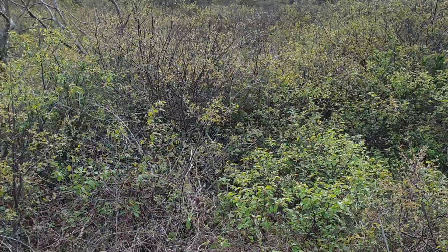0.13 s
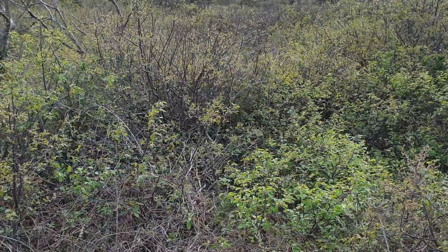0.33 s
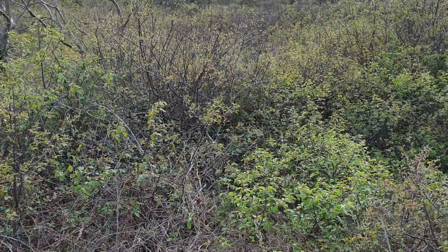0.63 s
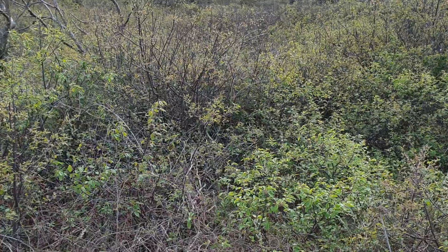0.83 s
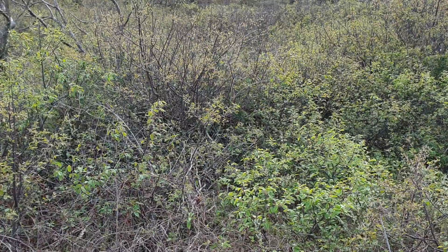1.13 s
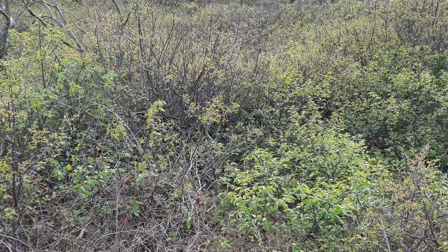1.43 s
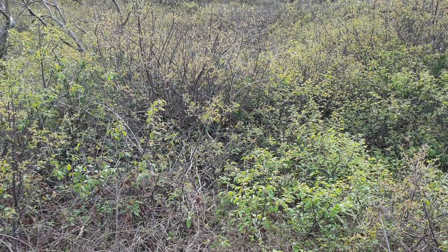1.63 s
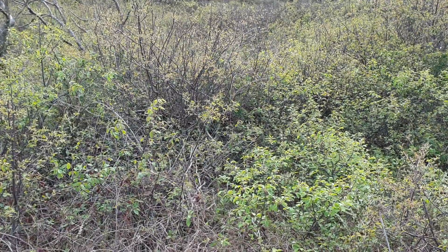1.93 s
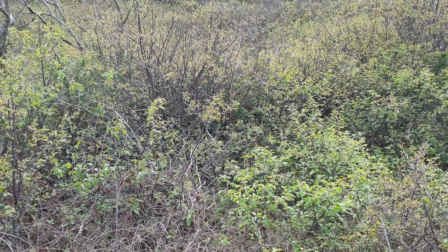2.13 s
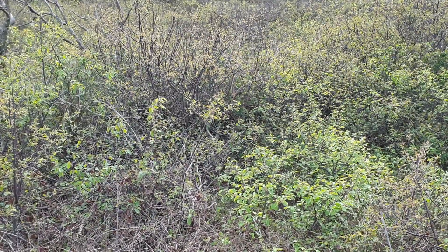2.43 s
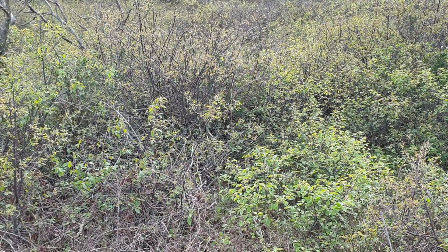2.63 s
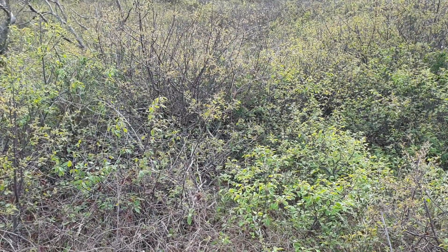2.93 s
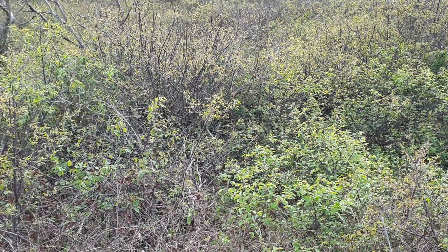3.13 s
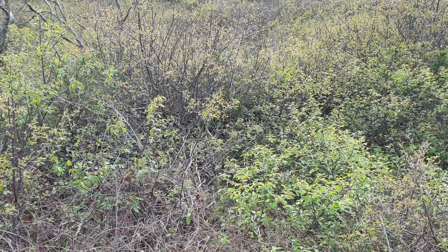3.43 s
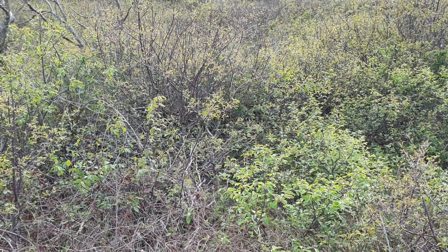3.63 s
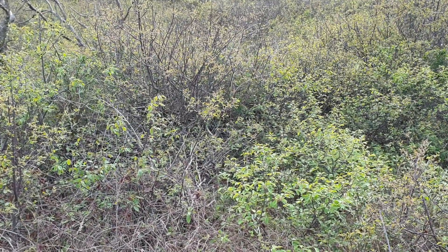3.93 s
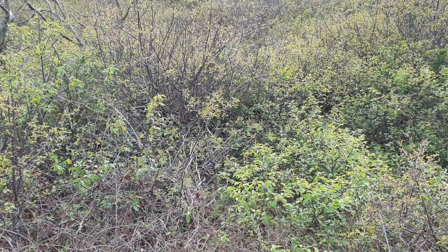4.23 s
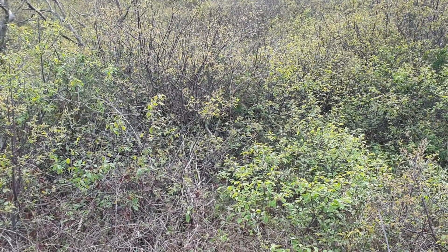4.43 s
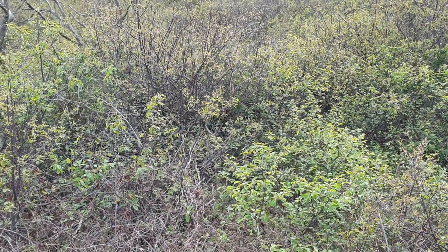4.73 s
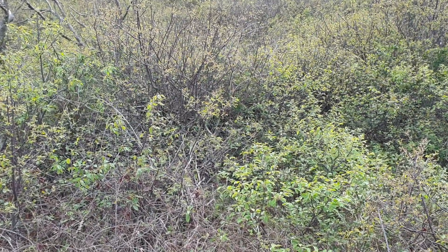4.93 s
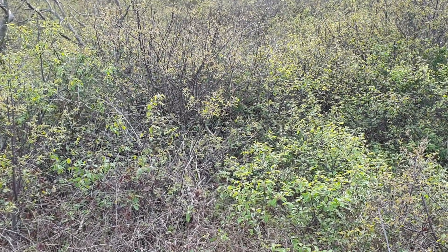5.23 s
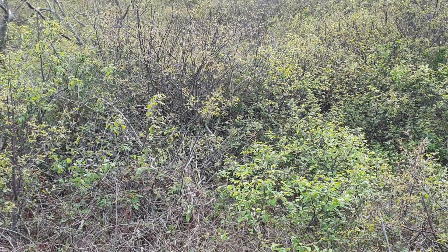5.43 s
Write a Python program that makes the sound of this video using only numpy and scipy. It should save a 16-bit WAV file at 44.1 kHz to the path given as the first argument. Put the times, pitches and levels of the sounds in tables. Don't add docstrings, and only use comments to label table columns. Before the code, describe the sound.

Open air in dense scrub, heard by a small stereo microphone without wind protection. From 0 to about 1.3 s, wind knocks hard, with dull low thumps and flutter shifting between sides, over a deep rumble and faint hiss. A neighbouring bird chatters quickly and hoarsely on the right from 0.5 to 1.3 s, over a blurred far chorus that fades by 2 s. Two short high notes sound around 1.4 s, then tiny low distant notes near 1.7. The nightingale, close and slightly right, begins at 1.8 s: a thin rising whistle, two throbbing harsh chips at 2.0 and 2.1, a sharp arch at 2.2, then rapid buzzing trills at 2.3, 2.7 and 3.1, separated by snaps and steep falling sweeps. A last sweep ends it at 3.4. Twigs scatter a short echo. Afterwards it is sparse: soft gusts, faint distant calls around 4.3 to 5, stronger buffets near 5.4 and short bird glides at the end.

```python
import sys
import numpy as np
from scipy import signal
from scipy.fft import rfft, irfft
from scipy.io import wavfile

SR = 44100
rng = np.random.default_rng(int(sys.argv[2]) if len(sys.argv) > 2 else 0)


def dump(signal):
    limited = np.clip(np.atleast_2d(signal).T, -1, 1)
    pcm = np.round(limited * 32767).astype(np.int16)
    wavfile.write(sys.argv[1], SR, pcm)


def amplitude_ratio(level_db):
    exponent = np.asarray(level_db, float) / 20
    return 10 ** exponent


N = 246519


def nightingale():
    heard = scrub(song(), pan_db=-3.5, ports=0.83, lag=.4, ground_db=-2, echo_db=-11,
                  scatter_db=9, t60=0.13, far_db=-7.5, far_t60=0.47)
    heard += scrub(chips(), pan_db=-1.5, ports=1, lag=.1, ground_db=-5, echo_db=-9.5,
                   scatter_db=12.5, t60=0.125, far_db=-5.5, far_t60=0.45)
    heard += scrub(trills(), pan_db=-2.0, ports=1, lag=0.09, ground_db=-5, echo_db=-11.5,
                   scatter_db=10.5, t60=0.14, far_db=-4.0, far_t60=0.43)
    return heard


# (time from the note's mark [s], pitch [Hz], level under its top [dB])
WHISTLE = [(-.068, 2013, -21), (-.058, 2350, -8.5), (-.03, 2346, -7), (0, 2416, 2.5), (.016, 2487, -9.5),
           (.022, 2516, -32)]
ARCH = [(-.05, 1286, -24), (-.042, 1800, -15), (-.025, 2040, -0.5), (-.01, 2430, -7), (0, 2725, 0.5),
        (.004, 2650, 0.5), (.009, 1943, -0.5), (.018, 1170, -18)]
RISE = [(-.015, 1353, -21.5), (-.008, 1774, -5), (0, 2035, -0.5), (.01, 2700, -1), (.014, 2890, -13)]
SHORT_RISE = [(-.012, 1450, -19), (-.006, 1750, -1.5), (0, 2050, -1), (.007, 2450, -4.5), (.011, 2600, -22)]
SNAP = [(-.0045, 3790, -23), (0, 2846, -0.5), (.004, 2300, -13.5), (.0095, 1560, -29)]
SHORT_SNAP = [(-.0035, 3000, -17.5), (0, 2660, -0.5), (.003, 2400, -4.5), (.0065, 1950, -23)]
WIDE_SWEEP = [(-.031, 2990, -24), (-.025, 3790, -24), (-.019, 3594, -20.5), (-.0135, 3465, -18),
              (-.009, 3260, 3), (0, 2764, -1), (.01, 2300, -10), (.018, 2000, -14.5), (.024, 1800, -29.5)]
SWEEP = [(-.032, 3594, -30.5), (-.021, 3580, -20), (-.0155, 3500, -23), (-.0115, 3316, 2.5),
         (0, 2800, -0.5), (.0105, 2280, -7.5), (.024, 2112, -36.5)]
LAST_SWEEP = [(-.024, 3950, -22.5), (-.016, 3770, -19), (-.01, 3350, -6.5), (0, 2740, -0.5),
              (.012, 2400, -7), (.024, 2235, -18)]
# (mark [s], top level [dB rms], length [ratio], pitch [ratio], swell [dB per s])
WHISTLE_TIMES = [
    (1.89, -40.5, 0.98, 1, 0.0024),
]
ARCH_TIMES = [
    (2.22, -33.5, 0.98, 1, 0.0023),
]
RISE_TIMES = [
    (2.516, -41.5, 0.93, 0.96, 198),
]
SHORT_RISE_TIMES = [
    (2.894, -47, 1.01, 0.99, 12),
    (3.302, -56, 1.2, 1.024, 10),
]
SNAP_TIMES = [
    (2.536, -29.5, 1.06, 0.96, 102.5),
    (2.913, -32, .9, 1, -100),
]
SHORT_SNAP_TIMES = [
    (3.32, -41.5, 0.95, 1.01, 10),
]
WIDE_SWEEP_TIMES = [
    (2.614, -30.5, 1.01, 1.043, 9.6),
]
SWEEP_TIMES = [
    (2.996, -30, 1.16, 1.004, 100),
]
LAST_SWEEP_TIMES = [
    (3.399, -35, 1.01, 1, 8.2),
]


def song():
    pure = [(WHISTLE, WHISTLE_TIMES), (LAST_SWEEP, LAST_SWEEP_TIMES), (RISE, RISE_TIMES),
            (SHORT_RISE, SHORT_RISE_TIMES), (WIDE_SWEEP, WIDE_SWEEP_TIMES), (SWEEP, SWEEP_TIMES)]
    quick = [(ARCH, ARCH_TIMES), (SNAP, SNAP_TIMES), (SHORT_SNAP, SHORT_SNAP_TIMES)]
    out = np.zeros(N)
    for shape, times in pure:
        out += sung(shape, times, overtone_db=-43.0, rough=0.038, rasp_hz=296.6)
    for shape, times in quick:
        out += sung(shape, times, overtone_db=-37.0, rough=0.05, rasp_hz=300)
    return out


# (time from its mark [s], pitch [Hz], level under its top [dB])
CHIP = [(-.031, 3916, -19.5), (-.027, 5200, -7), (-.0215, 7240, -19), (-.014, 7660, -19),
        (-.009, 6500, -11.5), (0, 5500, 0), (0.0127, 4400, -6), (0.024, 3080, -17)]
# (mark [s], top level [dB rms], length [ratio], pitch [ratio], swell [dB per s])
CHIP_TIMES = [
    (1.999, -41.5, .99, 0.99, 195),
    (2.102, -38, 1.01, 0.97, -150),
]


def chips():
    throb_hz, throb_swing_hz, throb_depth, throb_from_s = 168, 1100, 0.86, -.012
    out = np.zeros(N)
    s, hz, level_db = np.transpose(CHIP)
    for mark_s, top_db, length, pitch, swell in CHIP_TIMES:
        t = np.arange(s[0] * length, s[-1] * length, 1 / SR)
        turn = (t * throb_hz / length + 0.35) % 1
        on = np.clip((t - throb_from_s) / 0.0026, 0, 1)
        throb_db = 20 * np.log10(1 - on * throb_depth * np.cos(np.pi * turn) ** 2)
        track = pitch * np.interp(t / length, s, hz) + on * throb_swing_hz * (.5 - turn)
        note_db = top_db + 3.4 * on + swell * t + np.interp(t / length, s, level_db) + throb_db
        add_note(out, mark_s + t[0], track, note_db, overtone_db=-13.5, rough=0.18, rasp_hz=600)
    return out


# (pitch it favours open [Hz], pitch it closes to [Hz])
TRILL_MOUTHS = [
    (4530, 5400),
    (4400, 5600),
    (6650, 5900),
]
# (middle [s], rattle level [dB], low note level [dB])
TRILL_STROKES = [
    [(2.295, -53, -54), (2.307, -42, -53), (2.320, -45.5, -55.5), (2.333, -48, -53.5),
     (2.348, -48.5, -60.5), (2.362, -48, -55.5), (2.378, -49, -63), (2.393, -54, -65), (2.409, -53.5, -67),
     (2.424, -53.5, -59.5), (2.440, -59.5, -62)],
    [(2.700, -53.5, -67.5), (2.713, -50, -60.5), (2.726, -52.5, -55), (2.741, -57.5, -58.5),
     (2.754, -52.5, -64), (2.768, -58, -62.5), (2.782, -55.5, -60), (2.796, -55, -65), (2.810, -55.5, -64),
     (2.825, -57, -61)],
    [(3.094, -63.5, -61), (3.107, -54, -56), (3.119, -55, -59.5), (3.133, -54.5, -61), (3.147, -58, -71),
     (3.161, -54.5, -60), (3.175, -56.5, -68), (3.188, -57.5, -59.5), (3.201, -57.5, -61),
     (3.214, -61, -79), (3.228, -59, -66.5)],
]
# (pitch [Hz], lateness [ms], level at first stroke [dB], gain by the last [dB])
THROAT = [(3350, 5, 1, 4.5), (3950, 0.5, -1, 12), (4400, 0.5, 7, -7), (5233, -1, 1.5, 2.5),
          (5620, -0.5, 4, -4), (6350, 1.9, -0.5, 3.5), (6620, 1, 4.5, 0.5), (7150, 1.5, -2.5, -2.5),
          (7590, 3.5, -2.5, 0.5), (11400, 1.3, 7, 1.5)]


def trills():
    stroke_s = 0.011
    out = np.zeros(N)
    u = np.linspace(0, 1, round(stroke_s * SR))
    count = len(u)
    swell = -129 * (u - .36) ** 2 * np.where(u < .36, 3.5, .8)
    for (mouth_hz, closing_hz), strokes in zip(TRILL_MOUTHS, TRILL_STROKES):
        for (middle_s, rattle_db, low_db), along in zip(strokes, np.linspace(0, 1, len(strokes))):
            s = middle_s - .0054
            add_note(out, s + 0.0015, 2760 + 120 * u, low_db + swell,
                     overtone_db=-15.5, rough=0.18, rasp_hz=400)
            clicks = (rng.random(count) < 1500 / SR) * rng.standard_normal(count)
            rattle = clicks + 0.052 * rng.standard_normal(count)
            for (hz, late_ms, own_db, gained_db), luck in zip(THROAT, rng.standard_normal(len(THROAT))):
                hz = hz * (1 + .005 * rng.standard_normal())
                width_hz = 300 if hz < 8000 else 7500
                at = round((s + late_ms / 1000) * SR)
                ring = resonance(resonance(rattle, hz, width_hz), hz, 2.4 * width_hz)
                mouth_db = (1 - along) * favoured(hz, mouth_hz) + along * favoured(hz, closing_hz)
                level_db = rattle_db - 2.5 + own_db + along * gained_db + 1.9 * luck + swell + mouth_db
                out[at:at + count] += rms_one(ring) * amplitude_ratio(level_db - 3.5) * np.hanning(count) ** 0.22
                if hz < 8000:
                    add_note(out, at / SR, hz + 0.36 * width_hz * (u - .4), level_db - 2.5,
                             overtone_db=-15.5, rough=0.43, rasp_hz=400)
    return out


def favoured(hz, mouth_hz):
    return -min(25.5 * abs(np.log2(hz / mouth_hz)), 7.5)


def resonance(x, hz, width_hz):
    r = np.exp(-np.pi * width_hz / SR)
    return signal.lfilter([1, 0, -1], [1, -2 * r * np.cos(2 * np.pi * hz / SR), r * r], x)


def sung(shape, times, overtone_db, rough, rasp_hz):
    out = np.zeros(N)
    s, hz, level_db = np.transpose(shape)
    for mark_s, top_db, length, pitch, swell in times:
        t = np.arange(s[0] * length, s[-1] * length, 1 / SR)
        track = pitch * np.interp(t / length, s, hz)
        note_db = top_db + swell * t + np.interp(t / length, s, level_db)
        add_note(out, mark_s + t[0], track, note_db, overtone_db, rough, rasp_hz)
    return out


def add_note(out, start_s, hz, level_db, overtone_db, rough, rasp_hz):
    at = round(start_s * SR)
    count = min(len(hz), N - at)
    phase = 2 * np.pi * np.cumsum(hz) / SR + rough * drift(rasp_hz, count=len(hz))
    tone = np.sin(phase)
    for k in range(4):
        audible = (k + 2) * hz < 16000
        tone += amplitude_ratio(overtone_db - 1.2 * k) * np.sin((k + 2) * phase) * audible
    tone *= np.sqrt(2) * amplitude_ratio(level_db) * (1 + .5 * rough * drift(rasp_hz, count=len(hz)))
    out[at:at + count] += (tone * signal.windows.tukey(len(hz), .1))[:count]


def drift(rate, count=N):
    r = np.exp(-2 * np.pi * rate / SR)
    noise = rng.standard_normal(count + 3000)
    return rms_one(signal.lfilter([1], [1, -2 * r, r * r], noise)[3000:])


def rms_one(x):
    return x / np.sqrt(np.mean(x ** 2) + 1e-20)


# (left delay [ms], right delay [ms], left level [dB], right level [dB])
ECHOES = [(0.99, 0.917, -13.5, -11.5), (5.206, 5.2, -0.5, -12.5), (12.14, 16, -21, -20),
          (16.9, 6.3, -24.5, -32.5), (22.9, 11, -18, -25)]
# (pitch [Hz], left lead [radians])
PORTS = [(2900, 0), (3050, 1.3), (3480, 1.8), (3800, 3.5), (4130, 4.4), (4800, 5.5), (5800, 5.7),
         (6200, 6.8), (8000, 7.4)]
# (pitch [Hz], level [dB])
HOUSING = [(1000, 0), (7800, 4), (8800, -10.5), (9400, -4.5), (11500, 4), (15500, -7.5)]


def scrub(x, pan_db, lag, ground_db, echo_db, scatter_db, t60, far_db, far_t60, ports=0):
    ground_ms, ground_hz, ground_half_width_hz = 2.508, 2800, 400
    t = np.arange(round(.5 * SR)) / SR
    hz = np.fft.rfftfreq(len(t), 1 / SR)
    tail = rng.standard_normal((2, len(t))) / np.sqrt(SR) * np.clip(t / 0.008, 0, 1)
    tail *= amplitude_ratio(scatter_db - 60 * t / t60) + amplitude_ratio(far_db - 60 * t / far_t60)
    ground = amplitude_ratio(ground_db) / (1 + ((hz - ground_hz) / ground_half_width_hz) ** 6)
    clear = (1 + ground * np.exp(-2j * np.pi * hz * ground_ms / 1000)) * np.ones((2, 1))
    left_ms, right_ms, left_db, right_db = np.transpose(ECHOES)[:, :, None]
    clear[0] += np.sum(amplitude_ratio(left_db + echo_db) * np.exp(-2j * np.pi * hz * left_ms / 1000), axis=0)
    clear[1] += np.sum(amplitude_ratio(right_db + echo_db) * np.exp(-2j * np.pi * hz * right_ms / 1000), axis=0)
    clear[0] *= np.exp(-2j * np.pi * hz * lag / SR)
    clear[1] *= np.exp(-1j * ports * np.interp(hz, *np.transpose(PORTS)))
    clear /= 1 + (hz / 6500) ** 2
    heard = clear + rfft(tail) * (1 + (hz / 9000) ** 2) ** .5
    heard *= amplitude_ratio(np.interp(hz, *np.transpose(HOUSING)))
    early = 900
    path = np.roll(irfft(heard, len(t)), early, axis=1)
    return signal.fftconvolve(x[None], path, axes=1)[:, early:N + early] * amplitude_ratio([[pan_db / 2], [-pan_db / 2]])


# (start [s], length [s], first pitch [Hz], last pitch [Hz], level [dB rms])
RIGHT_BIRD = [(.505, 0.032, 4400, 3210, -63.5), (.548, 0.031, 3040, 4520, -61),
              (.58, 0.043, 3950, 2870, -56), (.72, 0.014, 3920, 2900, -67), (.75, 0.026, 2600, 4330, -59),
              (.785, 0.038, 3830, 2846, -55.5), (.90, 0.031, 3500, 4300, -71),
              (.945, 0.034, 2700, 3400, -62), (.98, 0.023, 4620, 3870, -67),
              (.985, 0.017, 2400, 2000, -68.5), (1.06, 0.034, 3490, 4130, -66.5),
              (1.105, 0.037, 2660, 3600, -62.5), (1.17, 0.024, 2610, 3390, -60.5),
              (1.22, 0.023, 2300, 3690, -63.5), (1.27, 0.028, 2620, 3660, -64.5),
              (1.14, 0.026, 2400, 2170, -71), (1.165, .02, 1840, 2050, -73),
              (1.185, 0.014, 2880, 2660, -66), (1.08, 0.014, 4320, 3960, -78),
              (1.285, 0.013, 2820, 2660, -68), (1.145, 0.022, 2900, 3400, -72),
              (1.27, .03, 1780, 2210, -73)]


def right_bird():
    notes = calls(RIGHT_BIRD, halfway=0.53, rough=0.59, rasp_hz=130)
    return amplitude_ratio(0.5) * scrub(notes, pan_db=-6.0, lag=4.95, ground_db=-18, echo_db=-0.5,
                            scatter_db=11, t60=0.13, far_db=-8.0, far_t60=0.39)


# (start [s], length [s], first pitch [Hz], last pitch [Hz], level [dB rms])
LEFT_BIRD = [(1.406, 0.037, 3570, 3480, -54), (1.458, 0.042, 4260, 4160, -49),
             (1.452, .008, 4600, 4300, -60), (4.91, 0.06, 5900, 3900, -76), (4.96, .035, 3900, 3780, -79),
             (5.185, 0.066, 5800, 3870, -74), (5.248, 0.045, 3860, 3820, -74),
             (5.289, 0.03, 3860, 3890, -49), (5.42, 0.058, 6450, 4200, -65), (5.474, .02, 4200, 4100, -68),
             (5.49, 0.045, 4090, 4040, -56), (5.535, .028, 4050, 4040, -53),
             (5.575, 0.035, 4300, 4560, -59)]


def left_bird():
    notes = calls(LEFT_BIRD, halfway=.72, rough=.2, rasp_hz=90)
    return scrub(notes, pan_db=-3.5, lag=-2.5, ground_db=-30.0, echo_db=-2.5,
                 scatter_db=15.0, t60=0.089, far_db=-3.5, far_t60=0.3)


# (start [s], length [s], first pitch [Hz], last pitch [Hz], level [dB rms])
HOARSE = [(.192, 0.048, 4750, 5100, -79.5), (.357, 0.012, 2350, 4180, -71.5),
          (.376, 0.058, 4410, 4960, -72), (.711, 0.027, 5850, 4350, -77.5), (1.246, 0.035, 5440, 5900, -73),
          (1.336, 0.026, 5880, 5030, -75), (1.592, 0.16, 3430, 3640, -76), (1.63, 0.15, 4100, 4040, -79.5),
          (1.565, 0.057, 2600, 3840, -75), (5.191, 0.049, 7260, 5970, -80), (5.433, 0.044, 7070, 5240, -71),
          (4.59, .06, 3400, 3140, -81.5)]


def hoarse_birds():
    notes = calls(HOARSE, halfway=0.67, rough=1.25, rasp_hz=170)
    return scrub(notes, pan_db=-6, lag=0.97, ground_db=-13.5, echo_db=-5.0,
                 scatter_db=15.0, t60=0.17, far_db=-5.5, far_t60=0.42)


# (start [s], length [s], first pitch [Hz], last pitch [Hz], level [dB rms])
FAR_BIRDS = [(.30, 0.22, 8170, 7840, -75), (3.70, 0.26, 5360, 4430, -89.5), (4.521, .041, 5710, 6410, -87),
             (4.721, .046, 5610, 6310, -85), (4.255, 0.018, 1400, 1420, -65),
             (4.255, .022, 2800, 2760, -76), (4.585, 0.079, 1432, 1326, -71),
             (4.59, 0.058, 2780, 2740, -64.5), (4.59, 0.093, 2340, 2225, -83),
             (4.995, 0.076, 3710, 3732, -64), (1.5, 0.097, 2176, 2232, -73.5),
             (1.668, 0.011, 1430, 1430, -65.5), (1.695, 0.013, 1415, 1430, -61.5),
             (1.725, 0.02, 1464, 1420, -61.5)]


def far_birds():
    notes = calls(FAR_BIRDS, halfway=0.54, rough=0.49, rasp_hz=100)
    return scrub(notes, pan_db=-2.0, lag=.4, ground_db=-22.0, echo_db=-2.0,
                 scatter_db=8.5, t60=0.11, far_db=-10.0, far_t60=0.49)


# (start [s], length [s], first pitch [Hz], last pitch [Hz], level [dB rms])
THIN = [(3.43, .22, 3230, 2800, -79), (4.855, .09, 4280, 4520, -87), (5.1, .055, 4560, 4450, -84),
        (5.15, .045, 4450, 3700, -84), (5.318, .068, 3870, 3960, -71), (5.29, .05, 3340, 3290, -83),
        (5.34, .035, 3330, 3800, -80), (5.483, .03, 2940, 3000, -77), (5.515, .055, 3080, 3650, -82)]


def thin_whistles():
    notes = calls(THIN, halfway=0.67, rough=.12, rasp_hz=60)
    return scrub(notes, pan_db=-1.5, lag=.6, ground_db=-15.0, echo_db=-13.0,
                 scatter_db=6, t60=0.1, far_db=-14, far_t60=0.37)


def calls(rows, halfway, rough, rasp_hz):
    out = np.zeros(N)
    for start_s, length_s, first_hz, last_hz, level_db in rows:
        u = np.linspace(-1, 1, round(length_s * SR))
        hz = first_hz + (last_hz - first_hz) * (halfway + .5 * u + (.5 - halfway) * u * u)
        note_db = level_db - 7 * (u - .1) ** 2
        add_note(out, start_s, hz, note_db, overtone_db=-44, rough=rough, rasp_hz=rasp_hz)
    return out


# (time [s], peak level [dB], pitch [Hz], left over right [dB])
KNOCKS = [(0.087, -23, 344, -3), (0.211, -30.5, 323, 0.5), (0.287, -28.5, 280, 2),
          (0.367, -33.5, 340, -2.5), (0.412, -29, 358, -2), (0.48, -25.5, 346, -2.5), (0.526, -30, 294, 5),
          (0.624, -32, 304, -7), (0.759, -34, 338, -8), (0.833, -31.5, 316, -1), (1.01, -40.5, 330, -11),
          (1.136, -30.5, 239, 4.0), (1.169, -38, 356, -5.5), (1.22, -34, 352, 6), (1.38, -30.5, 404, 8.5),
          (1.382, -26.5, 317, -5), (1.476, -39.5, 302, 8), (1.746, -31.5, 350, -4), (1.776, -28, 330, 2),
          (2.225, -41, 278, -6.5), (2.399, -36.5, 310, 0), (2.619, -38.5, 362, -15),
          (2.871, -46.5, 397, -12), (3.01, -38, 313, 7), (3.902, -45.5, 323, 1), (4.168, -37, 327, -13.5),
          (4.427, -42, 304, 0), (4.518, -35, 290, -2), (4.587, -38.5, 318, -4), (4.681, -35, 307, -3.5),
          (5.018, -43, 393, 6), (5.064, -44, 409, -6), (5.336, -32.5, 300, -1.5), (5.393, -28.5, 238, -1),
          (5.431, -36, 274, -7.5), (5.456, -28, 257, 2)]
# (time [s], peak level [dB], pitch [Hz], left over right [dB])
CRACKS = [(.088, -23, 630, 2.5), (.37, -34, 553, -9), (.417, -33, 560, -8), (.496, -24, 622, 5.5),
          (.573, -32.5, 633, -7.5), (.593, -33, 586, 2), (1.777, -35, 545, 0)]


def knocks():
    out = np.zeros((2, N))
    t = np.arange(-400, 800) / SR
    side = np.array([[.5], [-.5]])
    blows = KNOCKS + CRACKS
    for (s, peak_db, pitch_hz, pan_db), luck in zip(blows, rng.standard_normal((len(blows), 4))):
        at = max(round(s * SR) - 250, 0)
        hz = pitch_hz * amplitude_ratio(0.99 * luck[:2, None])
        thump = np.sin(2 * np.pi * hz * t + 2 * luck[2:, None]) * np.exp(-np.abs(t) * pitch_hz)
        out[:, at:at + len(t)] += (thump * amplitude_ratio(peak_db + 2.0 + side * pan_db))[:, :N - at]
    return signal.sosfilt(signal.butter(2, 1100, fs=SR, output="sos"), out)


# (pitch [Hz], level [dB per Hz])
RUMBLE = [(12, -40.5), (20, -12.5), (76, -0.5), (102, -2), (200, -13), (260, -35.5), (440, -120)]
# (pitch [Hz], level [dB per Hz])
FLUTTER = [(94, -27.5), (160, -4.5), (210, -1.5), (351, -1.5), (506, -12.5), (634, -20), (1100, -44),
           (1500, -54.5), (1950, -75), (3300, -120)]


def wind():
    rumble_db, pan_db, extra_db = gusts()
    side = np.array([[.5], [-.5]])
    eddies = np.array([drift(12.4), drift(24)])
    jolts = np.array([drift(67), drift(45)])
    rumble = rms_one(coloured(RUMBLE) * amplitude_ratio(4.63 * eddies + 1.0 * jolts))
    flutter_db = rumble_db + extra_db - 7.5 + side * 0.26 * pan_db
    low = rms_one(coloured(FLUTTER[:4]) * amplitude_ratio(3.82 * eddies + 4.05 * jolts))
    high = rms_one(coloured(FLUTTER[3:]) * amplitude_ratio(2.6 * eddies + 3.9 * jolts))
    flutter = amplitude_ratio(flutter_db) * (low + amplitude_ratio(-5.5 + 0.069 * (flutter_db + 43)) * high)
    return amplitude_ratio(3.0 + rumble_db + side * pan_db) * rumble + flutter


# (time [s], level [dB], left over right [dB])
BREEZE = [(0, -35, -4.5), (.6, -35, 2), (.7, -37.5, 5), (1.28, -43, 3), (1.6, -44.5, -10), (2.0, -56, -11),
          (2.4, -41.5, -8.5), (2.65, -44, -0.5), (2.94, -52, 7), (3.03, -46, 2), (3.3, -51.5, -2.5),
          (3.5, -45.5, 7), (3.78, -57, -4.5), (4.0, -45, -2), (4.7, -48.5, -0.5), (5.03, -46, -8),
          (5.2, -55.5, 6), (5.59, -55, 2.5)]
# (middle [s], half length [s], level over the breeze [dB], left over right [dB], flutter [dB])
GUSTS = [(0.101, 0.039, 6, 1.5, 2), (0.15, 0.053, -11.5, 9, 2), (0.262, 0.041, 2, -1, -6.5),
         (0.38, 0.13, -5.5, 9, 6.5), (0.482, 0.04, -2.5, -14, 9), (0.584, 0.12, -1, 5.5, 10),
         (1.395, 0.059, -14.5, -4, 24.5), (1.475, 0.064, -4, 24, 7.5), (1.666, 0.16, -9.5, 11, 4),
         (1.786, 0.12, 12.5, 21, -1.5), (1.957, 0.039, -14.5, -14, 8), (2.012, 0.064, 12.5, 1.5, -2),
         (2.082, 0.099, -6, 1, 1), (3.351, 0.12, -19.5, -27.5, 7.5), (3.437, 0.13, 3.5, -7, -1.5),
         (3.604, 0.023, 9.5, 9, -12.5), (4.077, 0.14, -7.5, -4.5, 6.5), (4.207, 0.13, 6, 0.5, 1),
         (4.38, 0.045, -1, 5, 5.5), (4.451, 0.065, 11.5, -4.5, -1.5), (4.543, 0.081, 3, -0.5, 7),
         (4.67, 0.073, 11.5, -5, 1), (5.278, 0.065, -16, -2.5, 14.5), (5.394, 0.15, 15.5, 5, 2.5),
         (1.22, 0.1, -0.5, -0.5, 7), (2.62, 0.14, 4.5, -5.5, -1), (4.299, 0.092, 1, -7.5, 5),
         (5.093, 0.078, 1, 2, 7), (5.469, 0.043, 9, 7, 2.5)]


def gusts():
    level_db, pan_db = in_time(BREEZE)
    middle_s, half_s, *columns = np.transpose(GUSTS)
    place = np.clip((np.arange(N)[:, None] / SR - middle_s) / half_s, -1, 1)
    swell = np.cos(np.pi / 2 * place) ** 2
    over_db, side_db, flutter_db = (swell @ column for column in columns)
    return level_db + over_db, pan_db + side_db, flutter_db


def in_time(rows):
    s, *columns = np.transpose(rows)
    return [np.interp(np.arange(N) / SR, s, column) for column in columns]


# (time [s], level [dB])
CHORUS = [(0, -81.5), (.35, -82), (.6, -76.5), (1.1, -75.5), (1.21, -68), (1.33, -76.5), (1.47, -82),
          (1.87, -86), (2.1, -120)]


def chorus():
    low_db, = in_time(CHORUS)
    high_db = -84 - 39.5 * np.clip(np.arange(N) / SR - 1.34, 0, None)
    low = coloured([(1500, -2.5), (3000, -6.0), (4500, -9.0), (6500, -20.0)])
    reeling = coloured([(5500, -19.5), (7400, -5.5), (8000, -15.0), (8600, -17)])
    return low * amplitude_ratio(low_db + 2.0 * drift(30)) + reeling * amplitude_ratio(high_db + 1.1 * drift(40))


# (pitch [Hz], level [dB])
AIR = [(470, -16), (800, -5.5), (906, -11), (964, -14.5), (1350, -11), (1600, -13.5), (1930, -16.5),
       (2110, -15), (2300, -19), (3640, -24), (4070, -24), (8460, -32), (12100, -23), (15500, -23)]


def air():
    return amplitude_ratio(-74) * coloured(AIR)


def coloured(spectrum):
    hz = np.fft.rfftfreq(N, 1 / SR) + 1
    at, level_db = np.transpose(spectrum)
    shape = amplitude_ratio(np.interp(np.log(hz), np.log(at), level_db)) * (hz >= at[0]) * (hz <= at[-1])
    return rms_one(irfft(rfft(rng.standard_normal((2, N))) * shape, N))


def scene():
    birds = nightingale() + right_bird() + left_bird() + hoarse_birds() + far_birds() + thin_whistles()
    return birds + knocks() + wind() + chorus() + air()


def roll_off(x):
    return signal.sosfilt(signal.butter(12, 15690, fs=SR, output="sos"), x)


def record(dry):
    return roll_off(dry)


dry = scene()
out = record(dry)
dump(out)
```